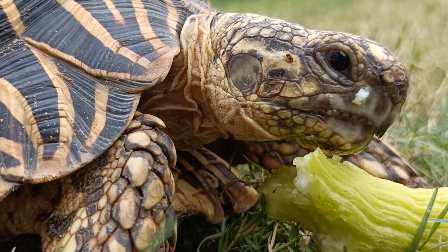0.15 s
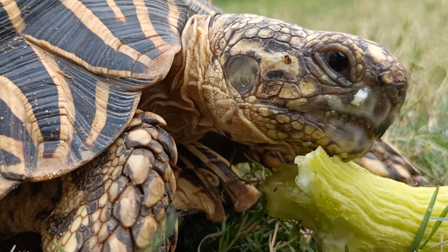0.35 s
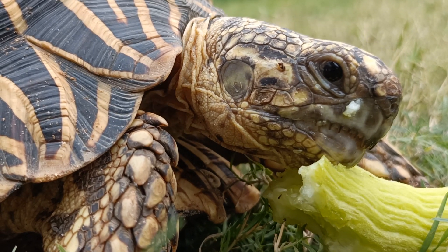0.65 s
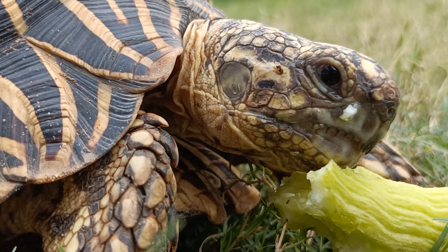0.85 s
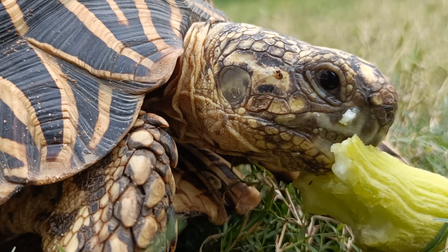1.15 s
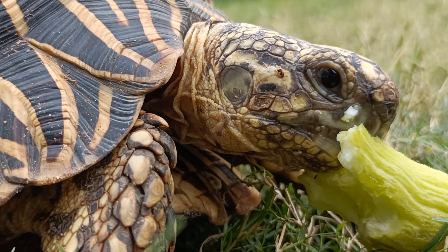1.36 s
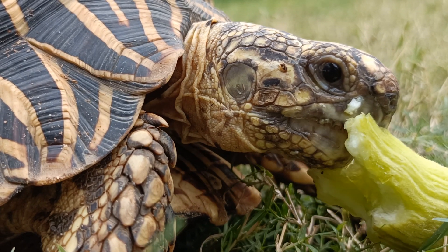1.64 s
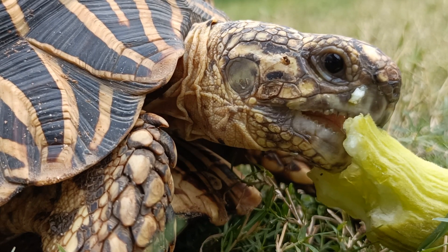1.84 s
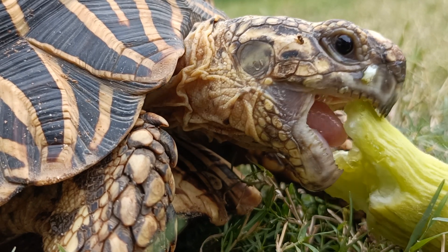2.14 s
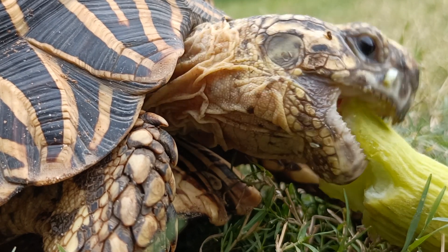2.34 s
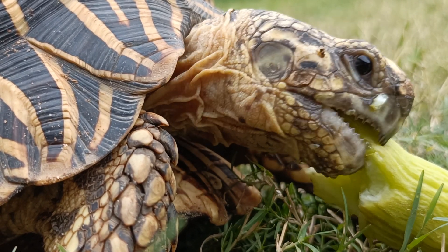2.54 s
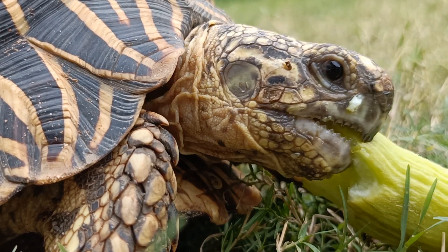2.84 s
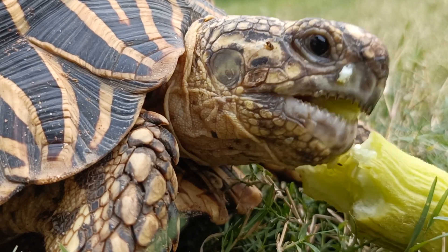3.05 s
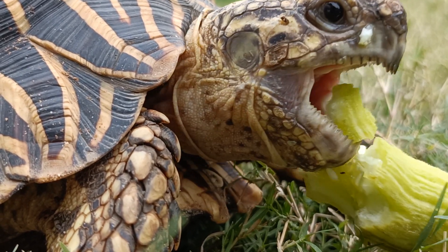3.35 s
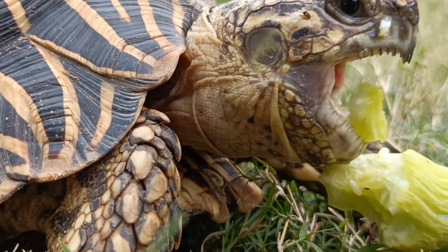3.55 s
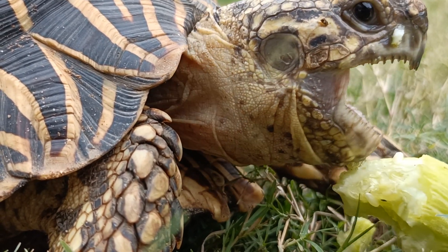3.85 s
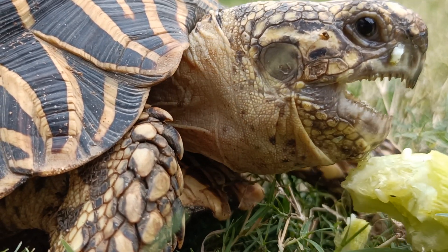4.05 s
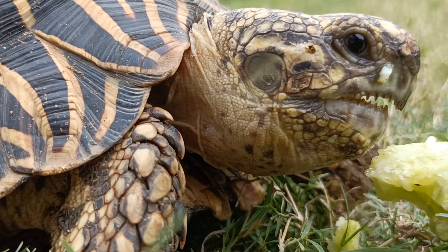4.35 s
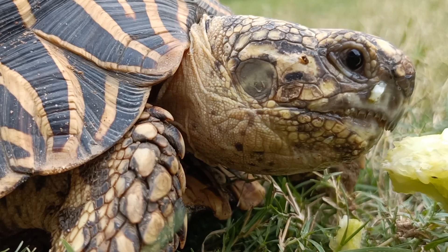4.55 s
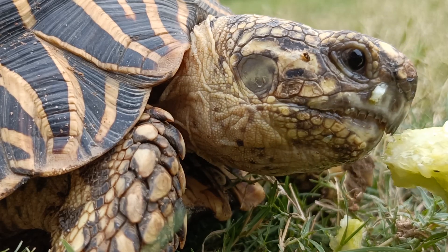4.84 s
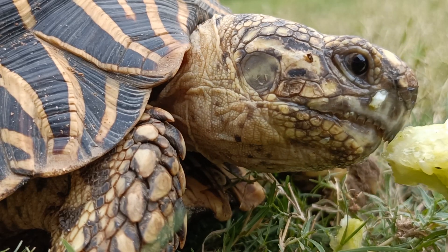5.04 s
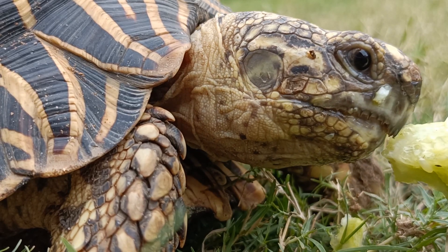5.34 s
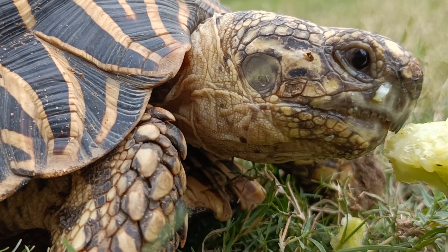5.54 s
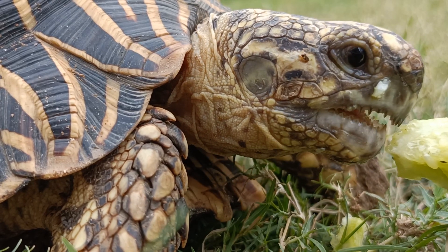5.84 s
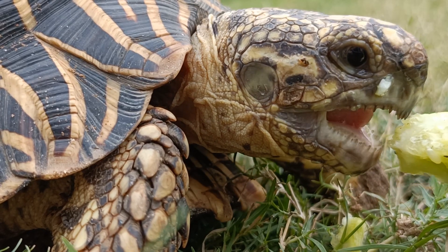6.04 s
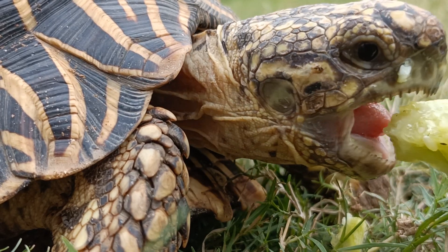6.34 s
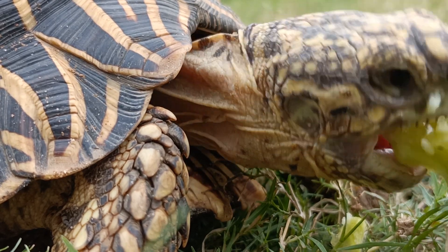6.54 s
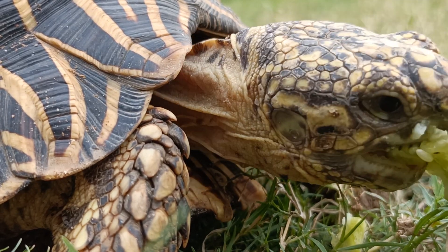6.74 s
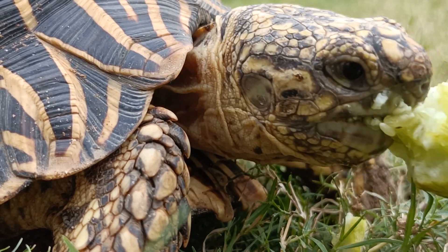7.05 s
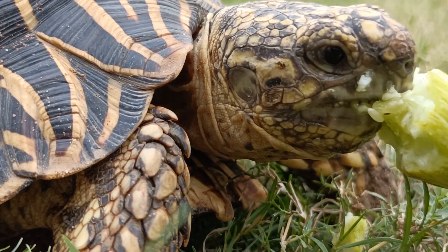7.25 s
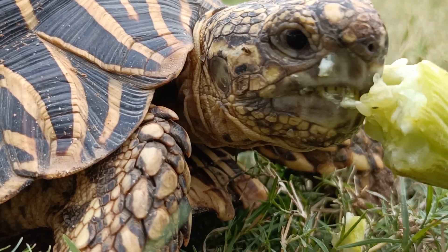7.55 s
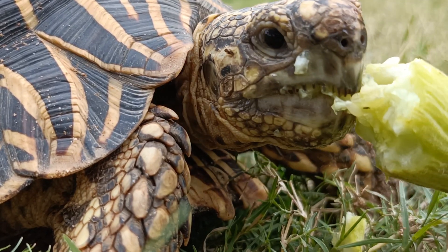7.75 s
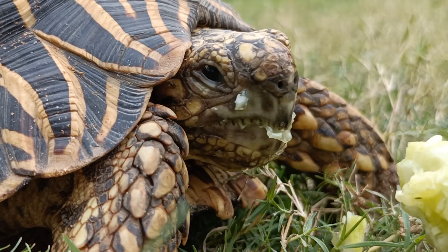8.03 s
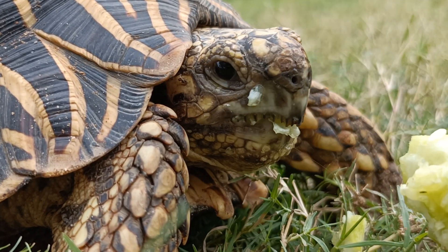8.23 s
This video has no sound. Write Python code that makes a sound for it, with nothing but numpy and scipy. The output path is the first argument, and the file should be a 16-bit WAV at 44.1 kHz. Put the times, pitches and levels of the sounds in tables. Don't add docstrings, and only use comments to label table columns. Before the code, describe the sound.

Two crisp cucumber bites snap sharply near the microphone, with fingers and grass rustling, birds chirping, a far broom swishing and faint traffic.

```python
import sys
import numpy as np
from scipy import signal
from scipy.io import wavfile
from scipy.ndimage import uniform_filter1d

SR = 44100
rng = np.random.default_rng(int(sys.argv[2]) if len(sys.argv) > 2 else 0)


def dump(signal):
    limited = np.clip(np.atleast_2d(signal).T, -1, 1)
    pcm = np.round(limited * 32767).astype(np.int16)
    wavfile.write(sys.argv[1], SR, pcm)


def elevation(decibels):
    levels = np.asarray(decibels, float)
    return 10 ** (levels / 20)


N = 369999


def evened(x):
    return x / np.sqrt(np.mean(x ** 2) + 1e-20)


def read(points, hz):
    f, value = np.transpose(points)
    return np.interp(np.log(hz + 1), np.log(f + 1), value)


def curve(rows):
    s, db = np.transpose(rows)
    return elevation(np.interp(np.arange(N) / SR, s, db))


def add(mix, s, sound):
    part = mix[:, round(s * SR):][:, :sound.shape[1]]
    part += sound[:, :part.shape[1]]


def placed(sound, pan_db):
    left = 1 / (1 + elevation(-pan_db))
    return 2 * np.outer([left, 1 - left], sound)


def beside_right(x, shadow_db):
    around = signal.lfilter(*signal.butter(2, 6000, fs=SR), x)
    return np.array([elevation(shadow_db) * around, x])


def coloured(x, points):
    log_gain = np.log(elevation(read(points, abs(np.fft.fftfreq(4096, 1 / SR)))))
    taps = np.fft.ifft(np.exp(np.conj(signal.hilbert(log_gain)))).real[:1024]
    return signal.oaconvolve(x, taps)[:len(x)]


def hiss(points, same, patchy_db):
    hz = np.fft.rfftfreq(2048, 1 / SR)
    a, b, c, d, patches = rng.standard_normal((N // 512 + 6, 1025, 5)).T
    patches = uniform_filter1d(patches, size=24, axis=0)
    patches = evened(uniform_filter1d(patches, size=8, axis=1))
    like = np.clip(read(same, hz), -1, 1)[:, None]
    left = a + 1j * b
    right = like * left + np.sqrt(1 - like ** 2) * (c + 1j * d)
    z = np.array([left, right]) * elevation(read(points, hz)[:, None] + patchy_db * patches)
    return evened(signal.istft(z, nperseg=2048, noverlap=1536)[1][:, :N])


# (frequency [Hz], level [dB])
TRAFFIC = [(20, -48), (35, -7), (55, 13), (64, 3.5), (80, -1.5), (130, -2), (220, -4.5), (400, -13.5),
           (520, -14.5), (700, -20), (1050, -24.5), (1600, -34), (4000, -43.5), (16000, -65.5)]
# (frequency [Hz], left-right correlation [-1..1])
SAME = [(60, 0.93), (180, 0.92), (550, 0.4), (1650, -0.65), (4970, 0.62), (15000, 0.16)]


def traffic():
    return elevation(-47.0) * hiss(TRAFFIC, SAME, patchy_db=0.72)


# (middle [s], half length [s], level [dB])
BROOM = [(0.017, 0.14, -72.5), (0.59, 0.14, -69.5), (1.146, 0.12, -76), (1.58, 0.29, -88.5),
         (2.584, 0.21, -84.5), (3.348, 0.18, -68.5), (3.685, 0.028, -74), (4.072, 0.16, -69),
         (4.37, 0.12, -78), (4.84, 0.24, -67.5), (5.763, 0.18, -67.5), (6.748, 0.16, -67),
         (7.275, 0.11, -82), (7.713, 0.2, -75.5), (7.997, 0.049, -66), (8.247, 0.083, -76)]
# (frequency [Hz], level [dB])
BRISTLES = [(600, -39), (1200, -15), (2200, -3), (4200, -2), (7000, -9.5), (10000, -6), (13000, -17),
            (16000, -20)]


def broom():
    t = np.arange(N) / SR
    power = sum(elevation(2 * db) * np.exp(-2 * abs((t - s) / half) ** 1.56) for s, half, db in BROOM)
    swell = elevation(9.5) * np.sqrt(power)
    return swell * hiss(BRISTLES, [(100, .1), (16000, 0)], patchy_db=.6)


# (frequency [Hz], level [dB])
BEAK = [(1600, 0), (2100, 0.5), (3000, 1), (4200, 7.5), (5200, 3), (6500, -11), (8500, -11.5), (11000, -17)]


def note(length, start_hz, end_hz, first_db, count, hoarse=0.028):
    u = np.linspace(0, 1, round(length * SR))
    waver = evened(uniform_filter1d(rng.standard_normal(16000), size=120))[:len(u)]
    hz = (end_hz + (start_hz - end_hz) * (1 - u) ** 1.4) * (1 + hoarse * waver)
    turn = 2 * np.pi * np.cumsum(hz) / SR
    tone = 0
    for k in range(1, count + 1):
        tone = tone + elevation(read(BEAK, k * hz) + first_db * (k == 1)) * np.sin(k * turn)
    flutter = evened(uniform_filter1d(rng.standard_normal(16000), size=110))[:len(u)]
    return (elevation(3 * flutter - 3) * tone * signal.windows.tukey(len(u), .5))[None]


def chirps(pure, reedy, count, hoarse):
    out = np.zeros((1, N))
    for notes, first_db, harmonics in ((pure, 11, count), (reedy, -7.5, count + 1)):
        for s, length, start_hz, end_hz, db in notes:
            add(out, s, elevation(db) * note(length, start_hz, end_hz, first_db, harmonics, hoarse))
    return out


# (time [s], length [s], start [Hz], end [Hz], level [dB])
STRAY_PURE = [(2.0, .15, 810, 790, -78), (2.17, .28, 500, 480, -75), (2.25, .2, 1480, 1460, -86),
              (2.28, .11, 1615, 1620, -86), (2.3, .16, 3260, 3220, -87), (2.47, .1, 3560, 3500, -88),
              (2.55, .077, 2574, 2450, -86), (2.57, .12, 3260, 3200, -87), (2.8, .14, 3260, 3220, -87),
              (2.85, .08, 3560, 3520, -87), (3.05, .22, 640, 620, -74), (3.17, .09, 2190, 2150, -76),
              (4.09, .07, 2230, 2050, -80), (4.33, .06, 2260, 2050, -79), (4.6, .07, 2850, 2800, -82),
              (4.82, .05, 2320, 2100, -79), (5.09, .065, 3860, 3090, -77), (5.145, .06, 3090, 3010, -75),
              (5.12, .06, 3800, 3300, -81), (5.15, .05, 5500, 4900, -80), (5.9, .3, 510, 490, -77),
              (6.25, .3, 505, 480, -76), (5.6, .07, 2220, 2080, -81), (5.865, .07, 2200, 2020, -80),
              (6.33, .07, 2150, 2050, -83), (6.495, .02, 2200, 2100, -76), (7.47, .04, 2300, 2260, -80),
              (8.215, .045, 2730, 2640, -80)]
STRAY_REEDY = [(3.6, .04, 1700, 1620, -72), (7.27, .06, 1740, 1520, -64), (7.54, .055, 1720, 1450, -62),
               (7.713, .06, 1920, 1660, -62), (7.762, .035, 1690, 1420, -61), (7.985, .03, 1850, 1760, -64),
               (8.02, .03, 1780, 1860, -65), (8.228, .03, 2050, 1930, -66), (8.248, .05, 1950, 1580, -65)]
# (time [s], pitch [factor], level [dB], wait on the top note [s], upper voice [dB])
FAR_CHIRPS = [(4.077, .98, -62, .035, -6), (4.339, .995, -62, .008, -2), (4.608, .995, -63, .006, -3),
              (5.355, .96, -69, .015, -1), (5.615, .97, -67, .012, -2), (5.875, .975, -66, .02, -3),
              (6.365, .87, -70, .035, -14), (6.929, 1.04, -65, .015, -6), (7.2, 1.005, -65, .004, -6),
              (7.466, .96, -66, .003, -1), (7.704, 1.04, -66, .002, 0), (7.96, 1.06, -68, .003, -2)]


def far_bird():
    out = chirps(STRAY_PURE, STRAY_REEDY, count=1, hoarse=.023)
    fall_s, low_db = .02, -6
    for s, pitch, db, wait, upper_db in FAR_CHIRPS:
        top, knee, end = 2170 * min(pitch, 1), 1720 * pitch, 1620 * pitch
        lead = note(0.048, 3050, 2930, 3.2, count=1)
        hold = note(wait + 0.013, top, .97 * top, low_db, count=2)
        drop = note(fall_s + 0.0086, .97 * top, knee, low_db, count=2)
        sag = note(.07, knee, end, -10.5, count=2)
        upper = note(.05, 5300 * pitch, 4900 * pitch, 0, count=1)
        add(out, s - .012, elevation(db - 9.5) * lead)
        add(out, s, elevation(db - 3.5) * hold)
        add(out, s + wait, elevation(db - 2.5) * drop)
        add(out, s + wait + fall_s, elevation(db - 1.5) * sag)
        add(out, s + wait + 0.67 * fall_s, elevation(db + upper_db) * upper)
    return out


def yard(x, t60, gap):
    taps = np.zeros((2, SR))
    starts = np.arange(0, SR - 20, 20)
    at = starts + rng.integers(0, 20, (2, len(starts)))
    np.put_along_axis(taps, at, rng.choice([-1., 1.], at.shape), 1)
    t = np.arange(SR) / SR
    low = signal.lfilter(*signal.butter(2, 5500, fs=SR), taps)
    tail = low * elevation(-60 * t / t60) + (taps - low) * elevation(-60 * t / (0.52 * t60))
    tail *= np.minimum(t / gap, 1)
    return signal.fftconvolve(x, tail / np.linalg.norm(tail[0]), axes=1)[:, :N]


# (time [s], length [s], start [Hz], end [Hz], level [dB])
NEAR_PURE = [(.432, 0.072, 3160, 3050, -60.5), (.468, 0.046, 3090, 2980, -48.5),
             (0.615, 0.07, 2260, 1950, -67), (.565, 0.065, 4500, 3000, -61.5),
             (1.668, .035, 3150, 3400, -69.5), (1.692, 0.0384, 3050, 2650, -59.5),
             (1.76, 0.036, 3800, 3000, -61), (1.683, 0.012, 1250, 2100, -67)]
NEAR_REEDY = [(0.489, 0.057, 2380, 2016, -51), (0.524, 0.071, 2024, 1984, -52.5),
              (.543, .055, 2330, 1997, -55), (1.68, 0.019, 1060, 1840, -63),
              (1.71, 0.056, 1922, 1687, -53.5), (1.748, .045, 1717, 1586, -49.5),
              (1.782, 0.011, 1650, 1420, -60)]


def birds():
    near = chirps(NEAR_PURE, NEAR_REEDY, count=6, hoarse=.016)
    far = far_bird()
    far = far + elevation(-6) * np.roll(far, round(0.048 * SR), axis=1)
    near = elevation(-3.0) * placed(near[0], 5.4) + elevation(-2.0) * yard(near, t60=0.64, gap=0.0065)
    far = elevation(1.5) * placed(far[0], 6.9) + elevation(1.5) * yard(far, t60=0.33, gap=0.019)
    return near + far


def grit(colour, per_s, spread_db):
    sizes = elevation(spread_db * np.minimum(rng.exponential(1, N), 2.3))
    sizes = sizes * (rng.random(N) < per_s / SR)
    shake = signal.oaconvolve(sizes, np.hanning(130), "same") + 2.1
    return evened(coloured(shake * rng.standard_normal(N), colour))


# (start [s], hold [s], level [dB])
RUB = [(0.056, 0.089, -58.5), (0.187, 0.22, -70.5), (2.196, 0.16, -69.5), (3.446, 0.31, -69),
       (7.81, 0.005, -56.5), (7.96, 0.11, -60)]


def slides():
    t = np.arange(N) / SR
    db = []
    for s, hold, top in RUB:
        before, after = np.maximum(s - t, 0), np.maximum(t - s - hold, 0)
        db.append(top - 400 * before - 365 * after)
    return elevation(np.maximum(np.max(db, axis=0), -96))


# (time [s], level [dB])
CRACKLE = [(0, -92), (.33, -56), (.49, -76), (.62, -67.5), (1.2, -64.5), (1.75, -68.5), (2.4, -67.5),
           (3.36, -64.5), (3.66, -56), (3.85, -66.5), (4.25, -58.5), (5.05, -68), (5.45, -76),
           (5.77, -71.5), (6.87, -72.5), (7.03, -56), (7.45, -69.5), (8.39, -68.5)]
# (frequency [Hz], level [dB])
GRAIN = [(600, -6), (1500, 2.5), (3000, 5.5), (6000, 0), (10000, 2), (16000, -3.5)]
PALM = [(400, -17), (900, -4.5), (2000, -1), (3500, 1.5), (5500, -5), (9000, -9), (16000, -8)]


def crackle():
    grass = curve(CRACKLE) * grit(GRAIN, per_s=250, spread_db=7.5)
    palm = elevation(7.5) * slides() * grit(PALM, per_s=420, spread_db=6.0)
    return beside_right(grass, -18) + beside_right(palm, -9)


# (time [s], peak [dB], pitch [Hz], left over right [dB])
KNOCKS = [(.010, -36, 233, -14), (0.052, -27.5, 303, -32), (.055, -29, 780, -17), (.015, -29.5, 336, -20),
          (.059, -29, 190, -24), (0.068, -27, 127, -26), (0.479, -48, 150, -1), (3.619, -42.5, 77.5, -24),
          (6.9788, -28.5, 766, -3), (7.815, -31.5, 71, -21)]


def knocks():
    out = np.zeros((2, N))
    for (s, db, hz, pan_db), noise in zip(KNOCKS, rng.standard_normal((len(KNOCKS), 4000))):
        turns = np.arange(0, 5, hz / SR)[:4000]
        rattle = evened(signal.lfilter(*signal.butter(2, 900, fs=SR), noise))[:len(turns)]
        push = (np.sin(2 * np.pi * turns) + 0.17 * rattle) * np.exp(-turns / 0.91)
        add(out, s, placed(elevation(db) * push, pan_db))
    return out


def crack(noise, db, hz, ring_db, sharp_db, rise, t60, ring_t60):
    t = np.arange(len(noise)) / SR
    burst = noise * elevation(-60 * t / t60) * np.minimum(t / rise, 1)
    edge = np.diff(burst, prepend=0)
    ring = np.sin(2 * np.pi * hz * t) * elevation(-60 * t / ring_t60) * np.minimum(t / 0.0001, 1)
    body = elevation(-8) * burst / abs(burst).max() + elevation(sharp_db + 3) * edge / abs(edge).max()
    return elevation(db) * (body + elevation(ring_db + 0.5) * ring)


# (time [s], peak [dB])
STEM_TICKS = [(0.4476, -54), (0.6183, -36), (0.7445, -51), (0.8263, -51), (0.8532, -49), (0.8931, -53),
              (0.9156, -57), (0.9455, -57), (0.9991, -51), (1.1411, -41), (1.191, -43), (1.2822, -44),
              (1.3536, -57), (1.4157, -61), (1.4898, -56), (1.5541, -51), (1.6499, -54), (1.9432, -45),
              (2.0147, -52), (2.1639, -48), (2.1718, -50), (2.2112, -44), (2.2367, -44), (2.3095, -55),
              (2.4806, -45), (2.5859, -52), (2.605, -53), (2.6677, -61), (2.6824, -60), (2.7585, -57),
              (2.7899, -59), (2.8578, -48), (2.8774, -49), (2.9132, -60), (3.107, -55), (3.1269, -52),
              (3.1793, -56), (3.2053, -55), (3.4552, -52), (3.5144, -47), (3.5254, -39), (3.7214, -41),
              (3.8574, -39), (3.9171, -49), (4.2773, -38.5), (4.7098, -42), (5.075, -54), (5.2171, -49),
              (6.1525, -53), (7.1474, -41), (7.2114, -40), (7.6175, -44), (7.6859, -46), (7.7153, -42),
              (8.2595, -46)]
# (frequency [Hz], level [dB])
STEM = [(1000, -26), (3000, -10), (5000, 0.5), (6500, -5.5), (9000, -4), (14000, -5)]


def stem_ticks():
    out = np.zeros((1, N))
    for (s, db), noise in zip(STEM_TICKS, rng.standard_normal((len(STEM_TICKS), 900))):
        snap = crack(noise, db, 6510, -15.5, -30, rise=0.0021, t60=0.014, ring_t60=0.01)
        add(out, s, snap[None])
    return elevation(6.5) * beside_right(coloured(out[0], STEM), -18)


# (time [s], peak [dB])
SLIP_TICKS = [(.0094, -32.5), (0.051, -32), (0.0563, -29.5), (.0714, -41), (0.1077, -26), (0.15, -26.5),
              (.183, -35), (0.2376, -34), (.2534, -40), (0.266, -33), (.329, -32), (.354, -33.5),
              (0.403, -33), (.6854, -39), (.8061, -41), (1.018, -41), (1.067, -40), (1.1686, -36),
              (1.5075, -40.5), (1.866, -41), (1.993, -41.5), (2.371, -35), (6.13, -45), (6.199, -36.5),
              (6.542, -42), (0.3782, -37), (.7264, -50), (2.895, -54), (2.735, -41),
              (3.42, -31), (3.5052, -20.5), (3.539, -36), (3.5557, -35), (3.5767, -35), (3.6084, -36),
               (3.621, -29.5), (3.6658, -28.5), (3.674, -33), (3.691, -27.5), (3.696, -29.5), (3.713, -38),
               (3.775, -35), (3.783, -35), (3.8497, -40), (7.0988, -48), (7.135, -49), (7.1796, -42),
               (7.199, -31), (7.231, -35.5), (7.313, -35.5), (7.341, -37), (7.415, -39.5), (7.911, -35.5),
               (7.9648, -33.5), (7.298, -40), (7.848, -42), (3.803, -39.5), (8.057, -25.5), (8.1, -34)]
# (time [s], peak [dB], ring [Hz], ring [dB])
POPS = [(0.088, -41, 2460, -1), (.098, -39, 2500, -7), (0.1295, -45, 2980, -1), (0.561, -43, 1300, -4),
        (.61, -49.5, 1230, 3), (2.048, -39, 2400, -11.5), (2.1848, -45.5, 1410, 0.5),
        (2.2671, -40.5, 2350, -3.5), (2.359, -47, 2160, -8), (2.84, -48, 4380, 1.5),
        (2.8716, -39, 1460, -14), (3.7674, -43, 2450, -4), (4.523, -38.5, 1330, -12),
        (4.565, -34.5, 1300, -20), (5.2385, -34, 2000, -13), (7.3897, -36, 1180, -16),
        (7.807, -37, 3470, -7), (7.8187, -27, 2950, -13), (8.155, -42.5, 2630, -12)]
# (frequency [Hz], level [dB])
FINGER = [(500, 7.5), (1500, -5), (3000, 1.5), (6500, -0.5), (10000, -0.5), (13000, -2.5), (16000, -16)]


def slip_ticks():
    out = np.zeros((1, N))
    slips = SLIP_TICKS
    low_hz, high_hz, faint_db = 1300, 5470, -71
    rings = low_hz * (high_hz / low_hz) ** rng.random(len(slips))
    rows = [(s, db, hz, faint_db - db) for (s, db), hz in zip(slips, rings)] + POPS
    for (s, db, hz, ring_db), noise in zip(rows, rng.standard_normal((len(rows), 900))):
        slip = crack(noise, db, hz, ring_db, -38, rise=0.0014, t60=0.016, ring_t60=0.017)
        add(out, s - .0005, slip[None])
    return elevation(5.5) * beside_right(coloured(out[0], FINGER), -19.5)


# (time [s], peak [dB], ring [Hz], ring [dB], treble [dB])
FIRST_BITE = [(2.5118, -37, 1210, -19, -3), (2.522, -45, 1600, -13, -6), (2.618, -51, 3530, -25, 4),
              (2.723, -55, 1250, -10, -1.5), (2.969, -38, 1900, -15, 3), (2.9768, -23, 3540, -32, -4),
              (2.9767, -23, 1750, -6, 3), (2.9827, -43, 1780, -10, -1.5), (2.9885, -43, 3400, -20, -1.5),
              (2.9927, -21.5, 6800, -16, 2), (2.9955, -44, 6550, -15, 3), (3.0118, -53, 3000, 1, -13),
              (3.022, -43, 2510, -16, -5), (3.03, -37, 2500, -24, 0), (3.0367, -34.5, 2260, -20, -1)]
SECOND_BITE = [(6.901, -42, 3220, -12, -8), (6.978, -18, 2080, -20, -12), (6.9787, -20.5, 2060, -6, -16),
               (6.9843, -34, 3580, -9, -17), (6.9887, -29, 5000, -16, -18), (7.007, -36, 1710, -12, -13),
               (7.02, -32.5, 5270, -12, -10), (7.0325, -19.5, 1500, -22.5, -30),
               (7.034, -40, 5500, -7, -20), (7.046, -35.5, 12100, 5, -5), (7.047, -40, 1450, -12, -20),
               (7.0708, -37, 1300, -6, -11), (7.93, -26, 3430, -36, -18), (8.2076, -45, 1210, -7.5, -2)]
# (frequency [Hz], level [dB])
FLESH = [(500, 5), (1500, 0.5), (4000, 2.5), (8000, 1.5), (12000, 6.5), (14500, -4), (16000, -18)]


def bites():
    out = np.zeros((2, N))
    for bite, pan_db in ((FIRST_BITE, 3), (SECOND_BITE, -0.5)):
        for (s, db, hz, ring_db, sharp_db), noise in zip(bite, rng.standard_normal((len(bite), 900))):
            parting = noise + 6 * signal.unit_impulse(900, idx=30)
            snap = crack(parting, db, hz, ring_db, sharp_db, rise=0.00077, t60=0.0085, ring_t60=0.012)
            add(out, s + .0004, placed(snap, pan_db))
    return np.array([coloured(side, FLESH) for side in out])


def scene():
    close = bites()
    scatter = elevation(-21) * yard(close.mean(0)[None], t60=.06, gap=.002)
    handling = slip_ticks() + stem_ticks() + crackle() + knocks()
    return close + scatter + handling + birds() + broom() + traffic()


def top_cut(x):
    return signal.sosfilt(signal.butter(12, 16790, fs=SR, output="sos"), x)


# (frequency [Hz], level [dB])
LEFT_PORT = [(300, -2), (1200, 2), (3500, 2), (5000, 1.5), (6100, -6.5), (7200, 9), (8200, 17.5), (9500, 5),
             (11700, -3), (13000, -1.5), (16000, -32)]
RIGHT_PORT = [(300, -1.5), (1200, 5), (3500, 2.5), (5000, 6), (6500, 14.5), (7300, 6.5), (8400, -11.5),
              (11000, -6.5), (11700, -8.5), (14500, 5.5), (16000, 2.5)]


def record(dry):
    ported = np.array([coloured(dry[0], LEFT_PORT), coloured(dry[1], RIGHT_PORT)])
    edge = signal.firwin(255, 16150, window=("kaiser", 7), fs=SR)
    return top_cut(signal.oaconvolve(ported, edge[None], "same"))


dry = scene()
out = record(dry)
dump(out)
```